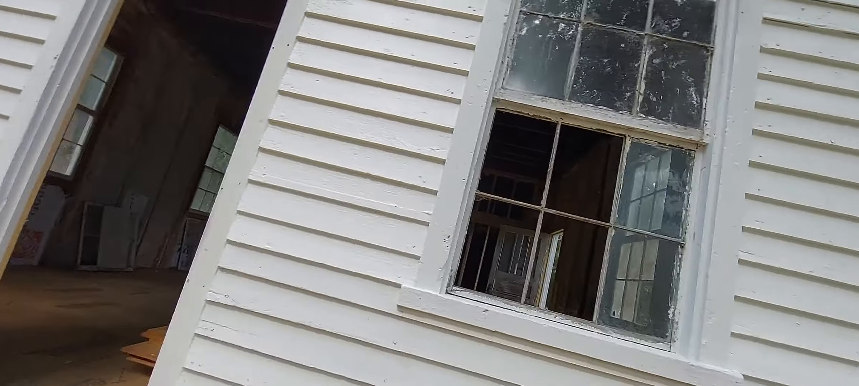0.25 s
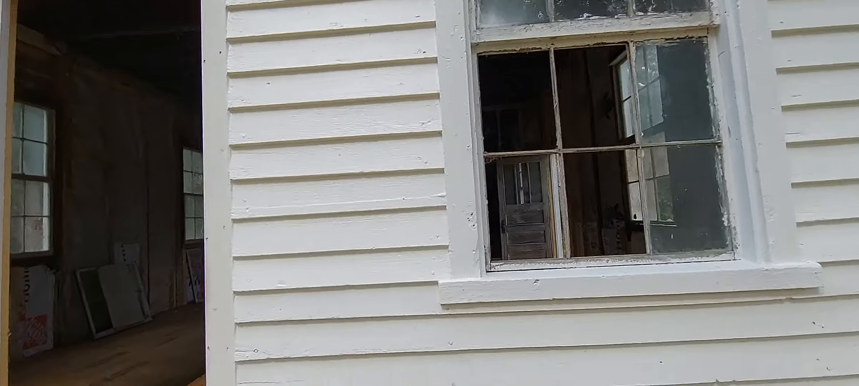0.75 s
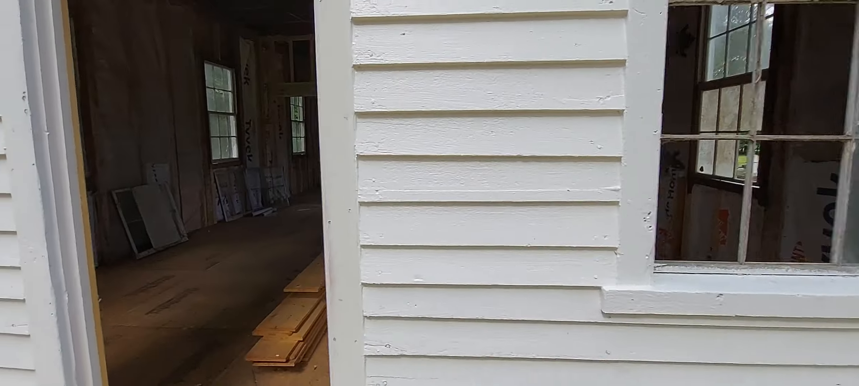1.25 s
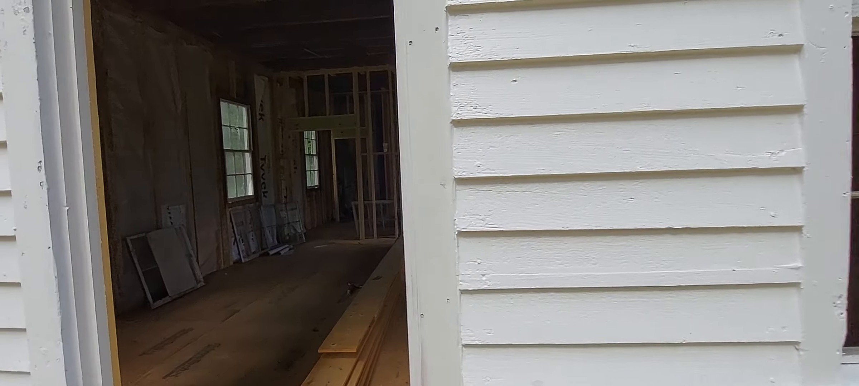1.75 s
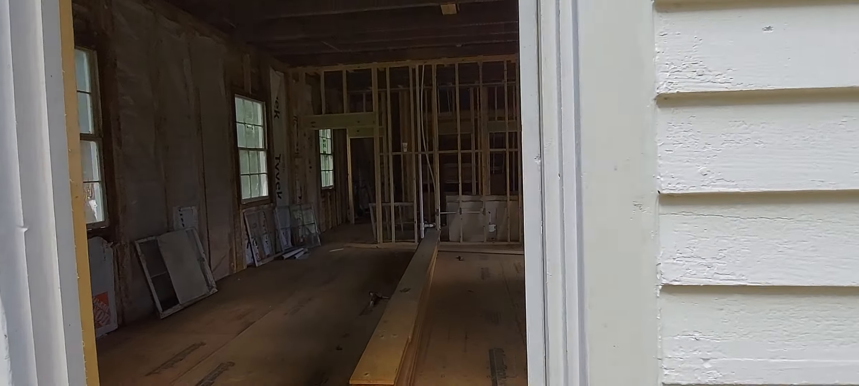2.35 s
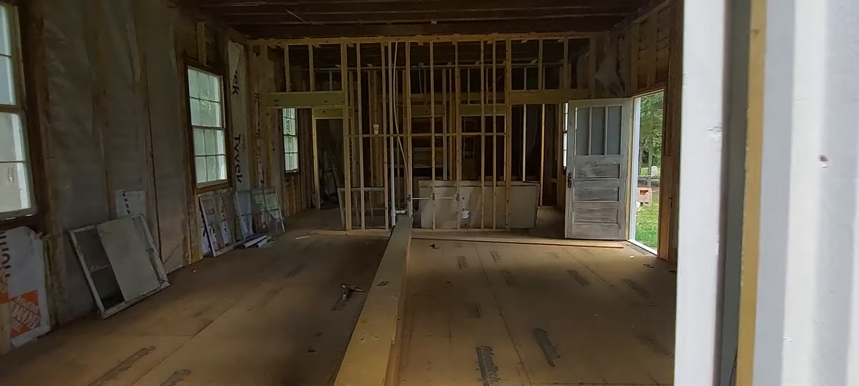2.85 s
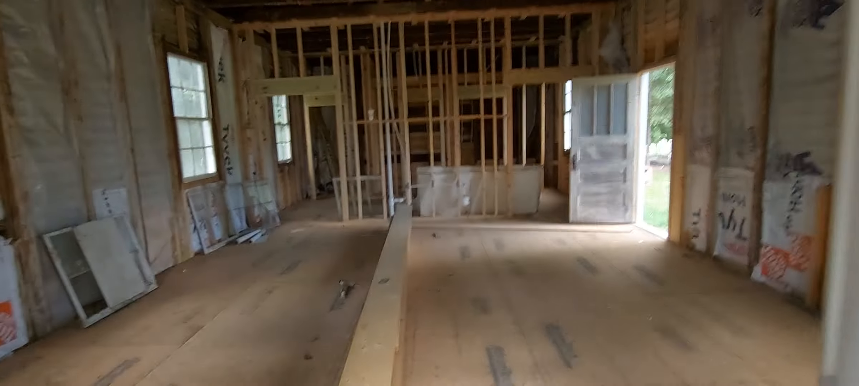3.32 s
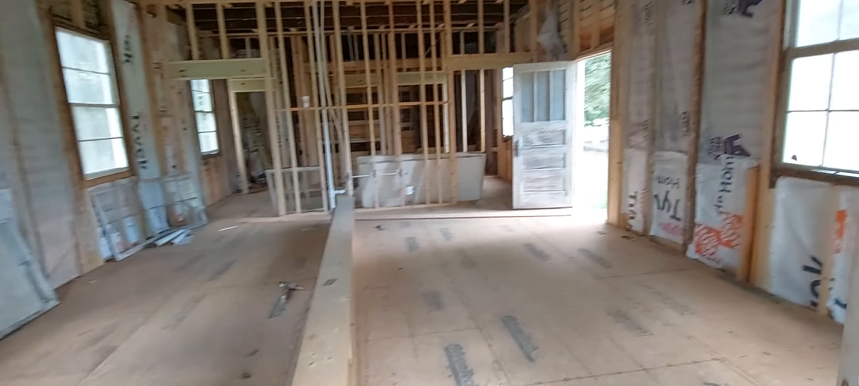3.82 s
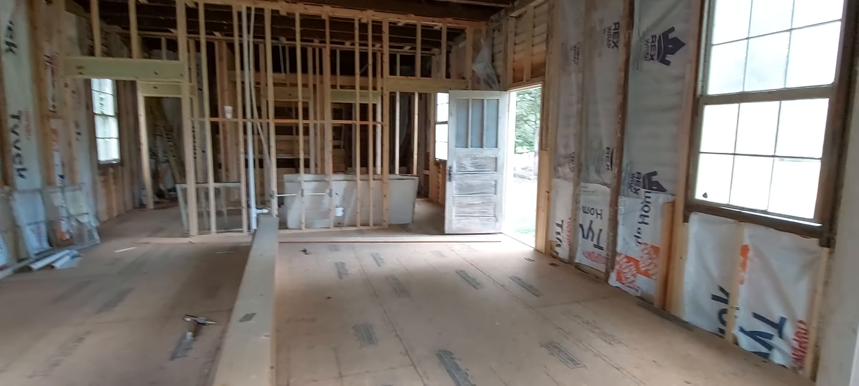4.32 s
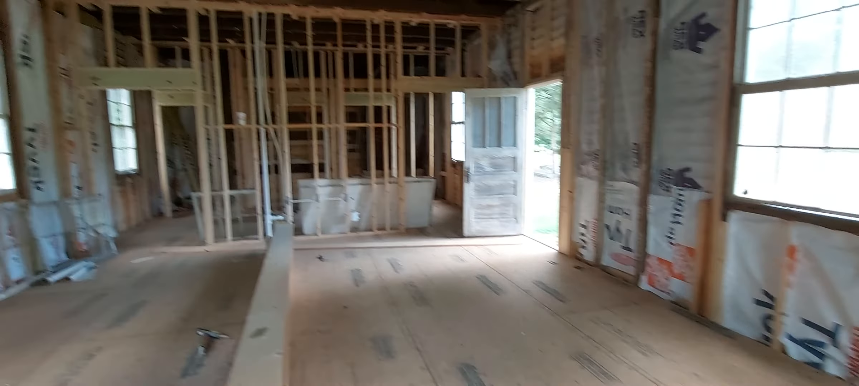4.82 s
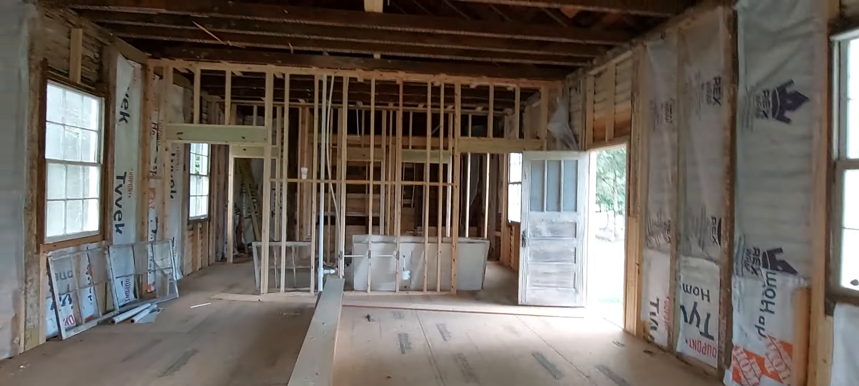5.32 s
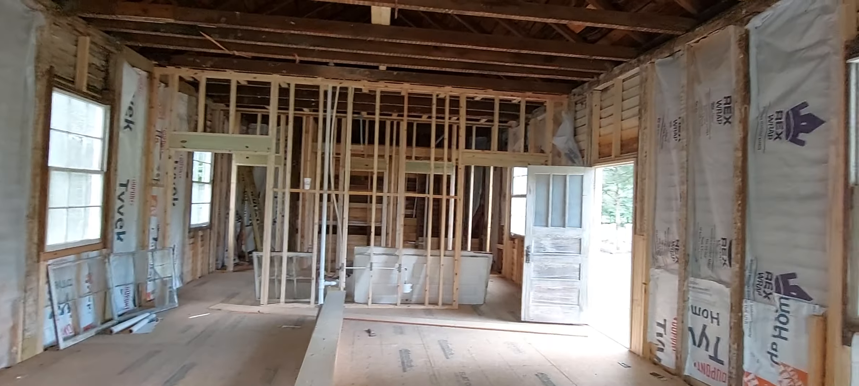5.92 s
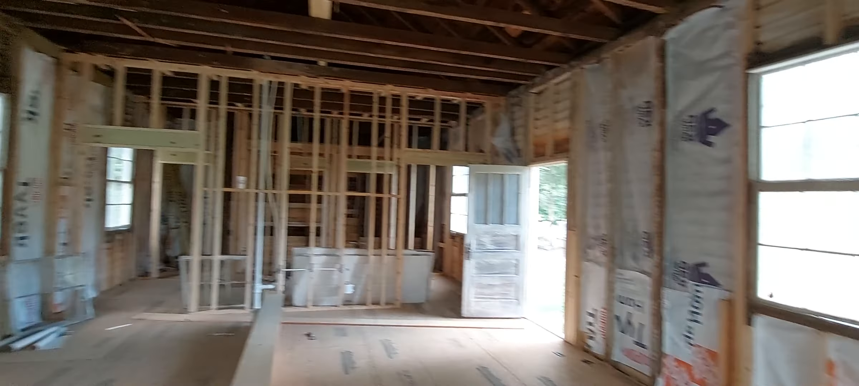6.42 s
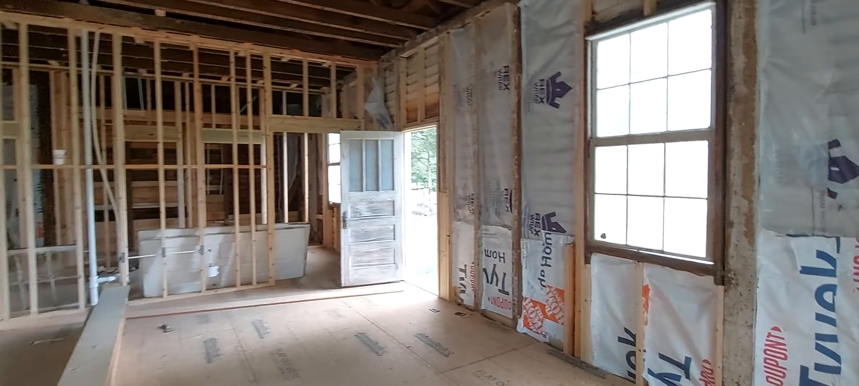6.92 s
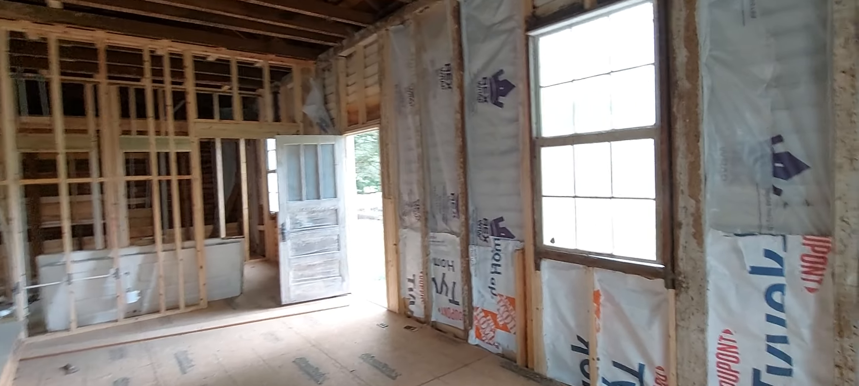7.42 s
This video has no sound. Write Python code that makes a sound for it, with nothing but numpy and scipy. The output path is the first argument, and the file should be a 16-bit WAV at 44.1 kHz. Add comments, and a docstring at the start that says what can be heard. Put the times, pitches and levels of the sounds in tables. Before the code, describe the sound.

Outdoors on a hollow deck, sharp board clicks and gritty scrapes sit over soft air hiss, insect shimmer and a distant wavering hum. A thin insect buzz and faint bird notes follow. The handheld stereo microphone then moves indoors: heavy hard knocks on plywood, a pause, another cluster of steps with scuffs, then only small ticks and clothing rustle in a quieter, reverberant bare room.

```python
"""Someone walks over a wooden porch, then through a doorway into a bare timber-framed room.
From the start the deck rumbles low, a far engine hums and air and insects hiss: shaped noise and a wavering tone.
Clothes rub, boards knock and soles scuff grit: bursts of grains that ring wood; thin ticks, a buzzer and a bird join.
Indoors the background is quieter and the walls answer each contact, by convolution with scattered tails."""
import sys
import numpy as np
from scipy import signal
from scipy.fft import rfft, irfft, next_fast_len
from scipy.io import wavfile
from scipy.ndimage import uniform_filter1d

SR = 44100
rng = np.random.default_rng(int(sys.argv[2]) if len(sys.argv) > 2 else 0)


def pcm_store(signal):
    """Save signal as 16-bit PCM."""
    levels = np.round(np.clip(np.atleast_2d(signal), -1, 1) * 32767)
    wavfile.write(sys.argv[1], SR, levels.astype(np.int16).T)


N = 338202   # length of the scene in samples

CHORUS_DB = (-53.5, -66.5, 3.5)   # far insects: dB on the porch, dB indoors, s half way


def from_db(db):
    """Amplitude factor of a level in dB."""
    return 10 ** (np.asarray(db) / 20)


def rms_one(x):
    """Scale to an rms of 1."""
    return x / np.sqrt(np.mean(x ** 2) + 1e-20)


def at_hz(points, hz):
    """Read a curve of (Hz, value) points, straight over log frequency."""
    points = np.array(points)
    return np.interp(np.log(hz), np.log(points[:, 0]), points[:, 1])


def panned(db):
    """Left and right gains that differ by db."""
    return from_db(np.array([[db / 2], [-db / 2]]))


def drift(rate):
    """Slow random wander of spread 1: noise through two equal low-pass poles at rate Hz."""
    r = np.exp(-80 * np.pi * rate / SR)   # computed on every 40th sample
    noise = rng.standard_normal(N // 40 + 2002)
    slow = signal.lfilter([1], [1, -2 * r, r * r], noise)[2000:]
    return np.interp(np.arange(N) / 40, np.arange(len(slow)), rms_one(slow))


def doorway(porch, indoors, half_way_s):
    """A value that glides from its porch to its indoor setting."""
    time_scale_s = 0.58
    passed = (1 + np.tanh((np.arange(N) / SR - half_way_s) / time_scale_s)) / 2
    return porch + (indoors - porch) * passed


def swell(peak_s, length_s, rise):
    """Bell-shaped rise to the peak, then a bell-shaped fall; rise is a share of the length."""
    t = (np.arange(N) / SR - peak_s) / length_s
    return np.exp(-np.where(t < 0, t / rise, t) ** 2)


def ring(x, hz, t60):
    """A struck mode that dies by 60 dB in t60 seconds."""
    r, w = from_db(-60 / (t60 * SR)), 2 * np.pi * hz / SR
    return signal.lfilter([0, np.sin(w)], [1, -2 * r * np.cos(w), r * r], x)


def resonance(x, hz, width_hz):
    """A two-pole resonance with gain 1 on top."""
    r = np.exp(-np.pi * width_hz / SR)
    poles = [1, -2 * r * np.cos(2 * np.pi * hz / SR), r * r]
    return signal.lfilter([(1 - r * r) / 2, 0, (r * r - 1) / 2], poles, x)


def band(x, low_hz, high_hz, order=2):
    """Band-pass filter."""
    return signal.sosfilt(signal.butter(order, [low_hz, high_hz], "band", fs=SR, output="sos"), x)


def wide_noise(colour):
    """Stereo noise of a given spectrum and rms 1, with a left-right likeness set for each pitch."""
    # How alike a spread sound is at the two ports. Each row: pitch in Hz, likeness (1 = the same).
    likeness = [(30, 1), (60, 0.97), (130, 0.83), (300, 0.97), (800, 0.048), (2000, 0), (5000, 0.061),
                (15000, 0.023)]
    size = next_fast_len(N)
    hz = np.maximum(np.fft.rfftfreq(size, 1 / SR), 1)
    mid, side = rfft(rng.standard_normal((2, size)))
    alike = np.clip(at_hz(likeness, hz), -1, 1)
    spectrum = np.sqrt(1 + alike) * mid + np.sqrt(1 - alike) * side * [[1], [-1]]
    return rms_one(irfft(spectrum * colour(hz), size)[:, :N])


def peaks(modes):
    """Spectrum of summed peaks, each given as (Hz, width Hz, dB)."""
    return lambda hz: sum(from_db(db) / (1 + ((hz - top) * 2 / width) ** 2) for top, width, db in modes)


def deck():
    """A steady rumble; as weight lands the floor flexes and swells it around a pitch of its own."""
    # Colour of the rumble. Each row: pitch in Hz, relative level in dB per Hz.
    flex_colour = [(12, -36.5), (20, -13.5), (38, -1.5), (81, 1.5), (130, -5.5), (170, -38), (290, -120)]
    # The floor flexing. Each row: peak in seconds, level in dB, pitch in Hz, width in Hz, length in seconds.
    landings = [(0.292, -48, 50.2, 50, 0.05), (0.746, -39, 33.5, 24.6, .09),
                (0.749, -31.5, 75.4, 91, 0.056), (0.83, -40, 60, 50, 0.022), (1.101, -50, 29.5, 24.9, 0.12),
                (0.956, -42, 44.7, 40, 0.056), (1.166, -42, 54.2, 79, 0.079),
                (2.52, -53.5, 66.3, 60, 0.095), (3.7, -53, 64.6, 40, 0.045), (4.056, -52.5, 68.8, 59, 0.17),
                (4.785, -49, 70.8, 39.9, 0.023), (4.913, -49.5, 71.1, 40.5, 0.057),
                (5.63, -47, 80.1, 79, 0.052), (6.721, -51, 124.1, 58.63, 0.026),
                (7.13, -44, 115.6, 24.85, 0.13), (7.512, -56, 140.6, 82.5, 0.065)]
    rumble = wide_noise(lambda hz: from_db(at_hz(flex_colour, hz)))
    out = from_db(doorway(-56.5, -60, 3.5)) * rumble
    for s, db, hz, width_hz, length_s in landings:
        flexing = rms_one(resonance(rumble, hz, width_hz))
        out += from_db(db) * swell(s, length_s, rise=0.46) * flexing
    return out


def engine():
    """A far engine's low order: one sine, wavering in pitch and level, lower in both indoors."""
    hz = doorway(145.9, 137.4, 4.5) + 4.8 * drift(7)
    level_db = doorway(-54.5, -60.5, 2) + 4.4 * drift(19.0)
    return from_db(level_db) * np.sin(2 * np.pi * np.cumsum(hz) / SR)


def air():
    """Rustle, low wash and hiss: bands of noise that flicker a little and drop indoors."""
    # Colour of the rustle. Each row: pitch in Hz, relative level in dB per Hz.
    rustle_colour = [(290, -23), (500, -4.5), (1100, -6), (1800, -10.5), (2600, -21.5), (3400, -7),
                     (5370, -10.5), (7000, -10), (9100, -33.5), (15400, -120)]
    # The rustle's middle band, fairly even on the porch, then dropping away.
    # Each row: time in seconds, level in dB.
    middle_levels = [(0, -66), (0.6, -66), (1.0, -64.5), (2.2, -69), (3.1, -67.5), (3.42, -78.5),
                     (7.6, -85.5)]
    rustle_db = doorway(-59, -76.5, 4.5) + 0.34 * drift(16)
    rustle = from_db(rustle_db) * wide_noise(lambda hz: from_db(at_hz(rustle_colour, hz)))
    middle_db = np.interp(np.arange(N) / SR, *np.transpose(middle_levels)) + 2.3 * drift(7.9)
    middle = from_db(middle_db) * wide_noise(peaks([(2360, 2450, 0)]))
    wash_db = doorway(-55.5, -68, 2.5) + 2 * drift(3.15)
    wash = from_db(wash_db) * wide_noise(peaks([(150.0, 61, 5.0), (238, 160, 2.5), (372.2, 2200, -9.5)]))
    hiss_db = doorway(-62, -73, 3.5) + 0.714 * drift(11)
    hiss = from_db(hiss_db) * wide_noise(peaks([(9440, 610, -9.0), (14680, 2800, -11)]))
    leaves_db = doorway(-63, -89.5, 2.5) + 1.0 * drift(8)   # a brighter rustle
    leaves = from_db(leaves_db) * wide_noise(peaks([(5000, 1930, 0)]))
    return rustle + middle + wash + hiss + leaves


def far_insects():
    """Far crowds blur into two bands of noise; uneven chirps ring within the lower one."""
    # The main chorus. Each row: pitch in Hz, width in Hz, relative level in dB.
    chorus_peaks = [(7227, 620, -1.5), (7770, 860, -5)]
    # A higher chorus. Each row: pitch in Hz, width in Hz, relative level in dB.
    upper_peaks = [(9220, 1000, 4.5), (9990, 300, 0)]
    chorus_db = doorway(*CHORUS_DB)
    chorus = from_db(chorus_db + 0.46 * drift(30)) * wide_noise(peaks(chorus_peaks))
    upper = from_db(doorway(-57, -70, 2.5)) * wide_noise(peaks(upper_peaks))
    chirp_hz, chirps_per_s, chirp_db = 7980, 36, -13   # dB re the chorus
    clicks = (rng.random(N) < chirps_per_s / SR) * rng.uniform(0.34, 1, N) + 1e-18
    chirps = rms_one(resonance(resonance(clicks, chirp_hz, 160), chirp_hz, 200))
    return chorus + upper + from_db(chorus_db + chirp_db) * chirps


def clothes():
    """Fabric brushes as the legs swing: a low and a high rub of noise under flickering swells."""
    # Each row: peak in seconds, level in dB, length in seconds, tilt toward the low rub in dB.
    swings = [(0.07, -57, 0.16, -7), (1.18, -53.5, 0.11, -2), (1.74, -57, 0.39, -5.5),
              (2.613, -59, 0.21, -8.5), (6.355, -81, 0.14, 14), (6.505, -71.5, 0.077, 3.5),
              (6.682, -61.5, 0.091, -0.5), (7.146, -65.5, 0.062, -7.5), (7.368, -68, 0.18, -5.5)]
    low = wide_noise(peaks([(1275, 880, 3), (1960, 150, -7)]))
    high = wide_noise(peaks([(3120, 3400, 0)]))
    rubbing = 0
    for s, db, length_s, tilt_db in swings:
        rub = from_db(db + tilt_db / 2) * low + from_db(db - 2.5 - tilt_db / 2) * high
        rubbing = rubbing + swell(s, length_s, rise=0.78) * rub
    return band(rubbing * from_db(1.6 * drift(60)), 1100, 8300)


def contacts(rows, grit, rise_ms, fall, width_share, settle, sink, floor_share, direct):
    """Each contact is a burst of grains that sounds directly, rings the boards and pushes the joists.
    Rows of the result: left, right, then two other directions that only reach the walls."""
    # Modes of the boards. Each row: pitch in Hz, level in dB before a random change, dying time (t60) in seconds.
    board_modes = [(640, 1.5, 0.013), (768, 6, 0.028), (924, 2.5, 0.021), (1235, 1.5, 0.03),
                   (1676, -1, 0.0046)]
    # Modes of the hollow under the floor. Each row: pitch in Hz, level in dB, dying time (t60) in seconds.
    joist_modes = [(171.6, -10.5, 0.27), (239.5, 2, 0.045), (332, -9, 0.043), (427, -3.5, 0.03)]
    out, t = np.zeros((4, N + SR)), np.arange(SR // 4) / SR
    for s, peak_db, hz, boards_db, treble_db, boom_db, contact_ms in rows:
        through = t / (max(contact_ms, .4) / 1000)
        lumps_db = grit * np.minimum(rng.exponential(1, len(t)), 5)
        grains = rng.standard_normal((4, len(t))) * from_db(lumps_db)
        force = (1 - np.exp(-t * 1000 / rise_ms)) * np.exp(-through ** fall)
        own = grains * force + 1e-18   # unalike in every direction
        burst = np.array([own[0], 0.77 * own[0] + 0.7 * own[1], own[2], own[3]])   # left and right partly alike

        # as the weight comes down the ring sinks and moves into the boards
        weight = np.clip(settle * through, 0, 1)
        light = burst * (1 - weight)
        ringing = resonance(light, hz, width_share * hz)
        ringing = ringing + resonance(burst * weight, sink * hz, width_share * hz)
        body = band(ringing + direct * light, max(floor_share * hz, 350), 4800, order=3)

        boards, board_push = 0, own[[0, 0, 2, 3]] * (0.1 + weight)
        for mode_hz, db, t60 in board_modes:
            boards = boards + from_db(db + rng.normal(0, 2.5)) * ring(board_push, mode_hz, t60)
        boards = band(boards, 280, 8200)
        # high pitches reach the two ports unalike, rolling off above 6960 Hz
        treble = band(band(own, 3700, 18000), 500, 6960, order=1)
        push = (0.4 + rng.standard_normal(len(t))) * force + 1e-18
        boom = sum(from_db(db) * ring(push, mode_hz, t60) for mode_hz, db, t60 in joist_modes)
        boom = band(boom, 170, 900, order=3)

        parts = zip((body, boards, treble, boom), (0, boards_db, treble_db, boom_db))
        sound = sum(from_db(db) * part / np.abs(part).max() for part, db in parts)
        sound[:2] *= panned(3 * rng.standard_normal())   # falls a little left or right at random
        start = round((s - 2 * rise_ms / 1000) * SR)   # the force starts to rise just before the onset
        out[:, start:start + len(t)] += from_db(peak_db) * sound
    return out[:, :N]


def knocks():
    """Short knocks on loose boards: the force jumps up fast and has a long thin tail."""
    # Each row: onset in seconds, peak of the body in dB, first ring in Hz, then boards, treble and boom
    # in dB re that peak, contact time in ms (at least 0.4 is used).
    knock_rows = [(0.148, -40, 3020, -23, -5, -39, 3.3), (0.1912, -18, 2140, -20.5, -17, -38, 0.25),
                  (0.199, -32, 2300, -25, -19, -24, 1.2), (0.296, -28.5, 2640, -19, -1, -39, 0.91),
                  (0.304, -32.5, 2800, -28, 1, -35, 1.3), (0.864, -39, 985, -22, -17, -32, 6.9),
                  (0.891, -32, 880, -9, -30, -16, 3.5), (0.919, -34.5, 1200, -20, -9, -33, 5.4),
                  (0.94, -38.5, 2500, -18, 3, -7.5, 4.2), (1.166, -40, 640, -10, 6, -7, 18),
                  (3.903, -25.5, 990, -14, -41, -12, 6.9), (3.94, -30.5, 2840, -18, -20, -3.5, 6.5),
                  (4.002, 0.5, 1410, -14.5, -16, -42, 1.8), (4.031, -1, 1257, -17, -24, -34.5, 3.8),
                  (4.081, -8.5, 1130, -19.5, -22.5, -14.5, 2), (4.595, -50, 820, 0.5, -4.5, -25, 3.5),
                  (4.665, -48.5, 3430, -35, -5, -29, 7.5), (5.106, -51.5, 2813, -28.5, -9, -26, 2.35),
                  (5.17, -45.5, 1120, -6, -15, -14, 2.7), (5.207, -45, 800, 3, -20, -21, 4.7),
                  (5.22, -17.5, 2110, -7, -14.5, -31, 1.34), (5.291, -19, 1440, -6, -15, -12.5, 3.3),
                  (5.36, -9.5, 1380, -8.5, -14.5, -14.5, 2.4), (5.6, -30, 1090, -8, -19, -26.5, 2.3),
                  (6.677, -34.5, 3637, -25, -19, -28, 1.5), (6.7, -46.5, 1980, -25, -4, -15, 2.5),
                  (7.086, -44.5, 1614, -23, -1, -12, 2.9), (7.104, -48, 2790, -28.5, -6, -16, 1.2),
                  (7.128, -42.5, 1500, -28, 0, -9, 1.7), (7.153, -42, 1963, -30, -17, -16, 1.53),
                  (7.169, -45, 1880, -30, -8, -16, 1.97), (7.179, -49, 3470, -30, 3, -18, 1.1)]
    return contacts(knock_rows, grit=1.3, rise_ms=0.59, fall=0.61, width_share=0.4,
                    settle=0.062, sink=0.49, floor_share=.45, direct=.33)


def scuffs():
    """Soles scuffing over grit: coarser grains under a force that holds, then stops abruptly."""
    # Each row: onset in seconds, peak of the body in dB, first ring in Hz, then boards, treble and boom
    # in dB re that peak, contact time in ms.
    scuff_rows = [(0.705, -9.5, 1770, -15, -7, -23.5, 31.3), (1.109, -20, 2360, -14, -8.5, -12, 22),
                  (1.759, -37, 570, -29, -3, -9.5, 79), (1.832, -41, 1250, -33, -2, -32, 72),
                  (1.88, -37, 3810, -6.5, 1, -15, 41), (2.51, -45, 3740, -5, 8, -5, 32),
                  (2.563, -41, 711, -20, -12, -6, 24), (3.009, -23.5, 3150, -23, -8.5, -26, 37),
                  (3.035, -26, 1870, -27, -27, -26, 46), (3.722, -35.5, 2773, -8, -4.5, -14.5, 45),
                  (3.838, -39, 870, -10.5, 5, -14.5, 160), (3.86, -24, 1012, -23.5, -27.5, -10.5, 59),
                  (5.365, -18.5, 900, -5, -29, -14, 21.3), (5.602, -23.5, 1700, -5.5, -10, -29, 28.2),
                  (6.685, -45, 2600, -30, -3, -9.5, 28)]
    return contacts(scuff_rows, grit=3.5, rise_ms=2.1, fall=5.0, width_share=0.5,
                    settle=0.95, sink=0.35, floor_share=.25, direct=.28)


def reverberate(directions, tails):
    """Convolve each direction with its own stereo tail, scaled to a set total energy, and sum."""
    tails = tails / np.sqrt(np.sum(tails ** 2) / 2)
    return signal.oaconvolve(directions[None], tails, axes=2).sum(axis=1)[:, :N]


def room(feet):
    """Bare studs scatter each direction into a dense tail that builds up, then dies band by band.
    The porch wall and roof answer with a tail that dies much sooner."""
    # How the room dies away. Each row: pitch in Hz, dying time (t60) in seconds.
    room_t60 = [(150, 0.99), (300, 0.49), (1000, 0.36), (3000, 0.36), (6000, 0.51), (11000, 0.35),
                (15000, 0.38)]
    t, edges = np.arange(SR * 3 // 4) / SR, 180 * 2 ** np.arange(0, 6.5, .8)   # s, Hz
    white = wide_noise(np.ones_like)[:, :3 * len(t)].reshape(2, 3, -1)   # ear, direction, time
    tail = 0
    for low, high in zip(edges, edges[1:]):
        lumps_db = 3.0 * rms_one(uniform_filter1d(rng.standard_normal(len(t)), size=600))   # separate studs stand out
        dying_db = -60 * t / at_hz(room_t60, np.sqrt(low * high))
        tail = -tail + band(white, low, high) * from_db(lumps_db + dying_db)   # signs alternate: no gap at the edges
    tail = tail * (1 - np.exp(-(t / 0.012) ** 2))
    porch_tail = (tail * from_db(-60 * t / 0.055))[:, :1, :SR // 4]   # 60 dB more loss every 0.055 s
    indoors = feet[1:] * from_db(doorway(-15.5, -3, 4))
    outdoors = feet[2:3] * from_db(doorway(-12, -30.5, 4))
    return reverberate(indoors, tail) + reverberate(outdoors, porch_tail)


def ticks():
    """Thin ticks: short dying noise bursts of the highest treble."""
    # Each row: start in seconds, peak in dB.
    tick_rows = [(1.163, -21.5), (1.985, -34), (2.005, -38), (2.512, -34), (2.669, -33.5), (3.099, -36),
                 (6.479, -48)]
    out, t = np.zeros((2, N)), np.arange(SR // 8) / SR
    for s, db in tick_rows:
        treble = band(rng.standard_normal((2, len(t))), 12500, 21600)
        burst = treble * t * from_db(-60 * t / 0.045)   # swells over a few ms, then dies
        start = round(s * SR)
        out[:, start:start + len(t)] += from_db(db) * burst / np.abs(burst).max()
    return out


def near_buzzer():
    """One near insect: a tone and a noise band that throb together at the wing rate."""
    top_hz, wing_hz = 9314, 63.7
    start_s, loudest_s, end_s, trail_s = 1.18, 1.97, 3.7, 0.36   # the song trails off before its end
    t = np.arange(N) / SR
    wing = np.cumsum(wing_hz + .15 * drift(2)) / SR % 1
    throb = np.exp(-((wing - .3) / 0.26) ** 2) + .5 * np.exp(-((wing - .63) / 0.028) ** 2)
    pitch = top_hz + 17.0 * drift(22) - 350 * (1 - np.minimum(throb, 1)) ** 2   # each stroke starts and ends flat
    tone = np.sin(2 * np.pi * np.cumsum(pitch) / SR)
    rasp = 0.37 * rms_one(resonance(rng.standard_normal(N), top_hz - 150, 160))
    level_db = -55.5 - np.interp(t, [start_s, loudest_s, end_s], [4.5, 0, 6.5])   # softer at both ends
    singing = (t > start_s) * np.clip((end_s - t) / trail_s, 0, 1)
    return from_db(level_db) * singing * rms_one(throb * (tone + rasp))


def bird():
    """Faint whistles: slightly warbling sines with soft ends that slide into their pitch."""
    # Each row: start in seconds, length in seconds, pitch in Hz, slide up into it in Hz, level in dB,
    # loss over the note in dB.
    notes = [(1.28, 0.23, 3720, 67, -58.5, 4), (1.773, 0.18, 3690, 410, -57, 5),
             (2.277, 0.17, 3620, 25, -54, 9), (2.479, 0.092, 3810, 240, -56, -3),
             (2.81, 0.13, 3500, 130, -62, -3)]
    out, t = np.zeros(N), np.arange(N) / SR
    warble = 75 * drift(120)   # Hz
    for s, length_s, hz, slide_hz, db, fade_db in notes:
        ends = np.clip(np.minimum(t - s, s + length_s - t) / 0.035, 0, 1)
        pitch = hz - slide_hz * np.exp(-np.abs(t - s) / 0.033) + warble
        level_db = db - fade_db * np.clip((t - s) / length_s, 0, 1)
        out += ends * from_db(level_db) * np.sin(2 * np.pi * np.cumsum(pitch) / SR)
    return out * from_db(2.5 * drift(40))


def scene():
    """The background, the walker with the answering walls, and the passing small sounds."""
    background = deck() + engine() + air() + far_insects()
    feet = knocks() + scuffs()
    walker = clothes() + feet[:2] + room(feet)
    return background + walker + ticks() + near_buzzer() + bird()


def record(dry):
    """The two ports differ in level and phase; the highest peaks are rounded and the top is cut."""
    # The two microphone ports. Each row: pitch in Hz, left minus right in dB, lead of the left in radians.
    ports = np.array([(30.55, -4, 1.9), (60, -10, 0.93), (114, -8, 0.62), (256.5, -3.5, 0.65),
                      (469, -2.5, -0.8), (930, -2, 0.36), (1440, -3.5, -0.88), (1904, -9, -1.3),
                      (2965, -6.5, 0.68), (4300, -3.5, -2.2), (6300, 4.5, 0.035), (14830, 1, 0.32)])
    size = next_fast_len(N)
    hz = np.maximum(np.fft.rfftfreq(size, 1 / SR), 1)
    gain = from_db(at_hz(ports[:, :2], hz) / 2)
    left = gain * np.exp(.5j * at_hz(ports[:, ::2], hz))   # each port takes half the difference
    heard = irfft(rfft(dry, size) * [left, 1 / left], size)[:, :N]
    rounded = 1.6 * np.tanh(heard / 1.6)
    return signal.sosfilt(signal.ellip(10, .5, 60, 15800, fs=SR, output="sos"), rounded)   # cut above 15800 Hz


dry = scene()
out = record(dry)
pcm_store(out)
```